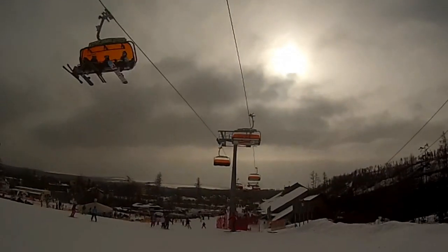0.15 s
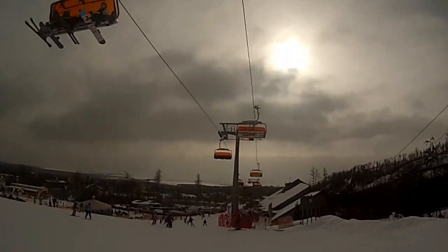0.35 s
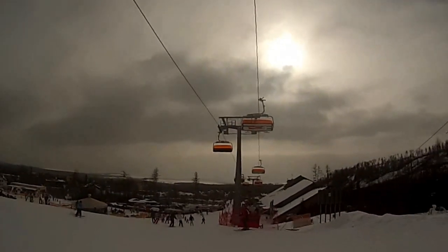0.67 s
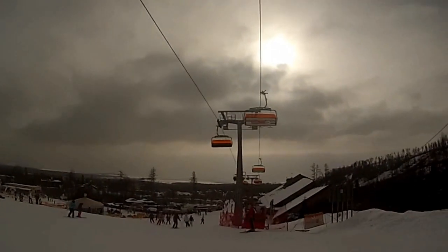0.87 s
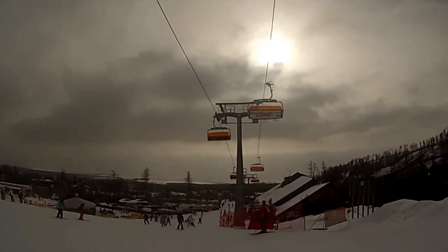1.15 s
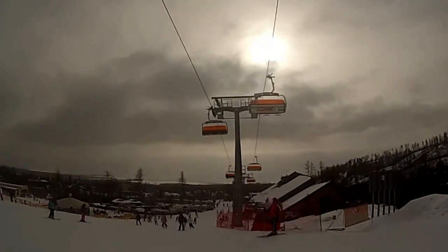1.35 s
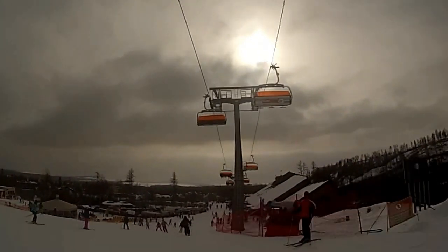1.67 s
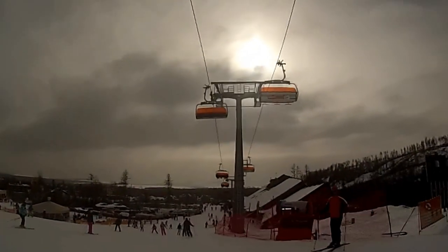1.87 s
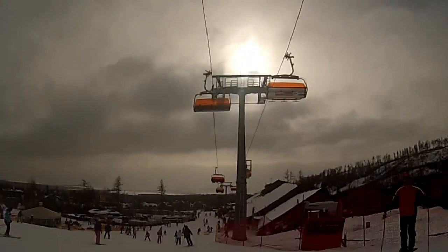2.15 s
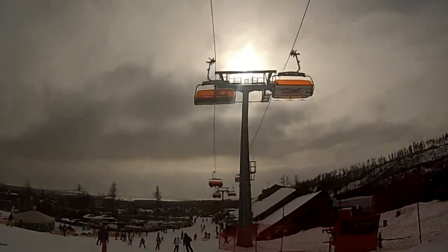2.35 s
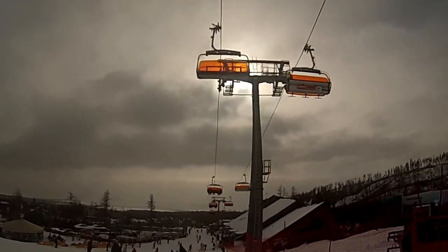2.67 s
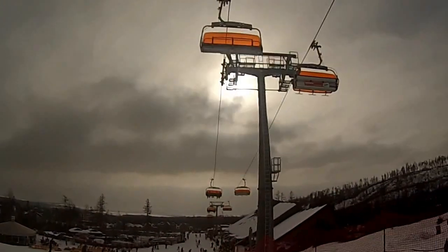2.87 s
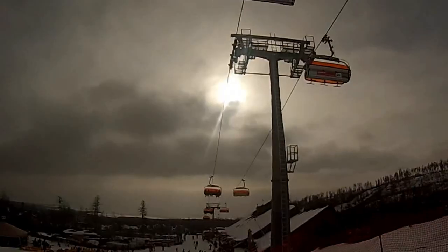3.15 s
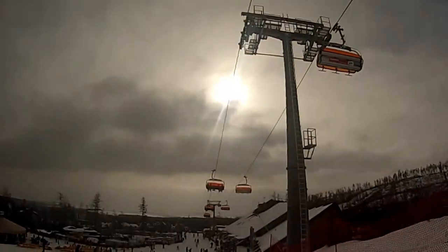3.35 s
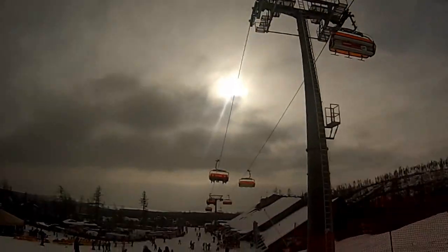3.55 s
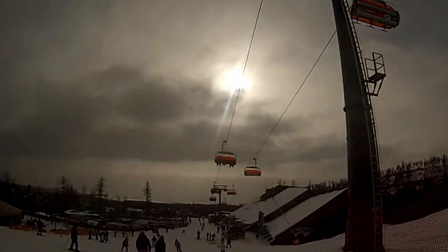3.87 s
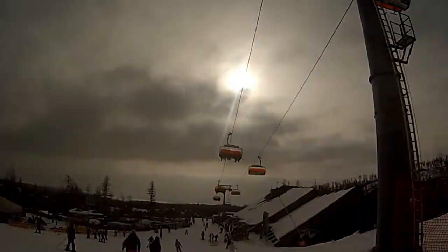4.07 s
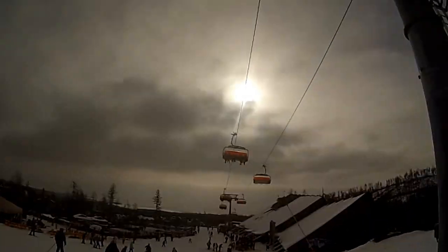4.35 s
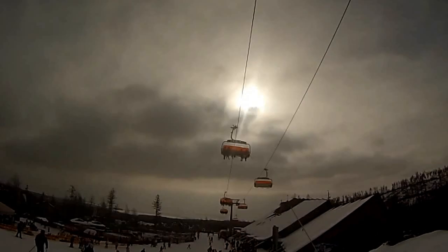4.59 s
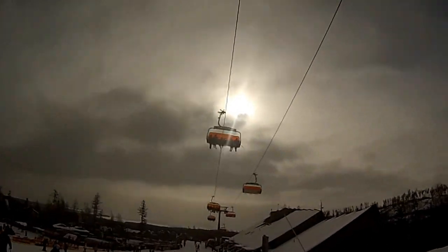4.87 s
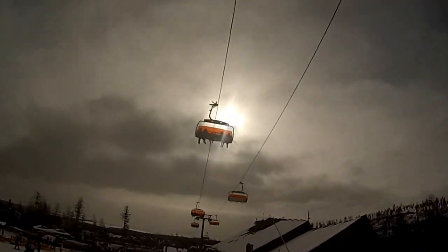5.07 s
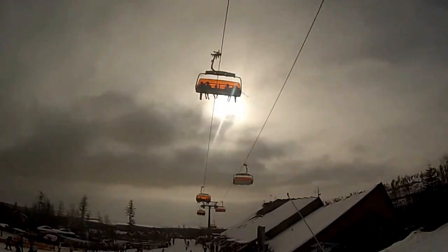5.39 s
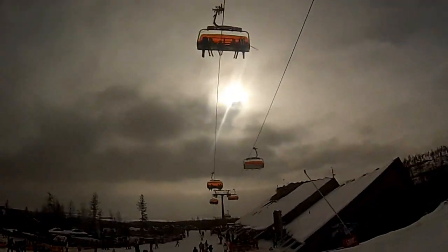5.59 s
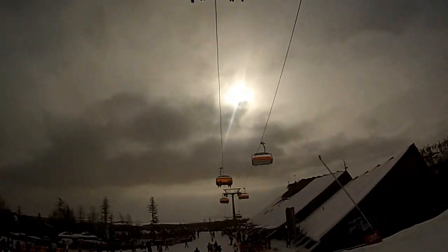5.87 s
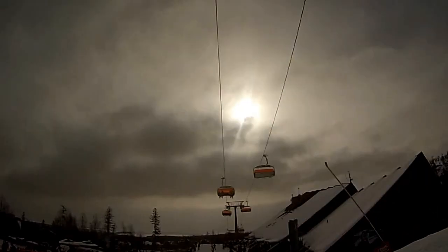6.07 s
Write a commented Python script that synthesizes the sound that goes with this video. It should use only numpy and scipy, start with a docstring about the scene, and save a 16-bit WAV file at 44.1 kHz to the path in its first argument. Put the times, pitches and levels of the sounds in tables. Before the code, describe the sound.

Low lumpy wind buffets a microphone over a gritty ski hiss on snow, swelling midway, with three hard thumps near five seconds.

```python
"""A snow slope, heard from a camera in a closed housing that rides downhill on a skier.
Wind buffets the microphone port: lumpy low-band noise at the eddy pace, with a broad roar above it.
Skis hiss and ice grains tick: tilted, flickering noise and short puffs through the housing's resonances.
Three hard gusts thump the membrane: pointed pressure pushes with a crack; a limiter ducks everything briefly."""
import sys
import numpy as np
from scipy import signal
from scipy.fft import rfft, irfft
from scipy.io import wavfile
from scipy.ndimage import uniform_filter1d

SR = 44100
rng = np.random.default_rng(int(sys.argv[2]) if len(sys.argv) > 2 else 0)


def inscribe(sig):
    """Save sig as 16-bit PCM at rate SR to the path in sys.argv[1].

    A 1-D sig is mono; a 2-D sig holds one channel per row.
    Samples are clipped to [-1, 1] before scaling.
    """
    pcm = np.round(np.clip(np.atleast_2d(sig).T, -1, 1) * 32767)
    wavfile.write(sys.argv[1], SR, pcm.astype(np.int16))


def invert_db(level):
    """Linear amplitude ratio for a level in decibels (20 dB per decade), elementwise."""
    return 10 ** (np.asarray(level, dtype=float) / 20)


N = 274743


def evened(x):
    """Scales to rms 1."""
    return x / np.sqrt(np.mean(x ** 2) + 1e-20)


def curve(rows, column, t):
    """Reads one column of a table at times t, linear between rows."""
    return np.interp(t, [row[0] for row in rows], [row[column] for row in rows])


def one_pole(x, r):
    """First-order low-pass with pole r and unit gain at 0 Hz."""
    return signal.lfilter([1 - r], [1, -r], x)


def noise(field_db, size):
    """Noise whose short-time level follows field_db(t, hz); a field of 0 dB gives rms 1."""
    hop = size // 4
    t = np.arange(N // hop + 5) * hop / SR
    hz = np.fft.rfftfreq(size, 1 / SR)
    real, imag = rng.standard_normal((2, len(t), len(hz)))
    gain = invert_db(field_db(t[:, None], hz[None] + 1))  # + 1 keeps log(hz) finite
    spectra = (real + 1j * imag) * gain / np.sqrt(size / 3)
    return signal.istft(spectra.T, nperseg=size, noverlap=size - hop)[1][:N]


def chance(t, hz, seconds, width_hz):
    """A smooth random field of rms 1 over time and frequency."""
    frames = max(1, round(seconds / (t[1, 0] - t[0, 0])))
    bins = max(1, round(width_hz / (hz[0, 1] - hz[0, 0])))
    field = uniform_filter1d(rng.standard_normal((t.size, hz.size)), frames, 0)
    return evened(uniform_filter1d(field, bins, 1))


def wind_db(t):
    """Level of the wind: uneven airflow with single buffets added on top, summed as power."""
    # uneven airflow over the port, rising and dropping: start_s, level_db
    airflow = [(0.0, -33.5), (0.8, -31.5), (1.17, -33), (1.55, -30), (1.75, -37), (1.83, -29.5),
               (2.39, -37.5), (2.64, -30.5), (3.17, -37), (3.31, -23.5), (3.54, -22), (3.71, -33),
               (3.88, -19), (4.12, -31.5), (4.46, -29), (4.7, -19), (4.95, -33.5), (5.2, -21.5),
               (5.32, -33.5), (5.6, -32), (6.23, -30)]
    # buffets riding on the airflow: peak_s, peak_db
    buffets = [(0.18, -27), (0.41, -28.5), (0.55, -32), (1.01, -30), (1.23, -30), (1.92, -27), (2.11, -27),
               (2.29, -27.5), (2.49, -27), (2.98, -27.5), (3.13, -33.5), (4.03, -14), (4.25, -22.5),
               (4.42, -26.5), (4.7, -25), (5.02, -20), (5.39, -24), (5.63, -30), (5.739, -16), (5.98, -23)]
    rise_db_s, fall_db_s = 160, 172
    power = invert_db(2 * curve(airflow, 1, t))
    for s, db in buffets:
        drop_db = np.where(t < s, rise_db_s * (s - t), fall_db_s * (t - s))
        power = power + invert_db(2 * (db - drop_db))
    return 10 * np.log10(power)


def buffeting(width_hz=60, steady=0.36, top_hz=76):
    """Eddies shed at the port: noise in a low wide resonance, its own lumps partly evened."""
    # pace at which eddies are shed: start_s, pace_hz
    shedding = [(0, 41.95), (1, 39.03), (2.6, 49), (4, 41.96), (5.2, 32.88), (6.23, 40)]
    t, r = np.arange(N) / SR, np.exp(-np.pi * width_hz / SR)
    slow = rng.standard_normal(N) + 1j * rng.standard_normal(N)
    slow = one_pole(one_pole(slow, r), r)
    carrier = np.exp(2j * np.pi * np.cumsum(curve(shedding, 1, t)) / SR)
    band = signal.butter(2, [13, top_hz], "band", fs=SR, output="sos")
    eddies = evened(signal.sosfiltfilt(band, (slow * carrier).real))
    lumps = np.sqrt(abs(uniform_filter1d(uniform_filter1d(eddies ** 2, 1500), 1000)))
    return evened(eddies / (lumps + 0.1) ** steady) * invert_db(wind_db(t))


def snow(t):
    """Level and brightness of the ski hiss: glide plus bites, each colouring by its share of the power."""
    # skis gliding: start_s, level_db, brightness_db_per_octave
    glides = [(0.0, -47.5, 1.5), (0.95, -50, 1), (1.25, -46.5, 1.5), (1.45, -49, 2), (1.75, -45.5, 1),
              (2.2, -47, 1.2), (2.55, -43, 0), (2.76, -45, 0), (3.09, -46.5, 0.7), (3.43, -36.5, -2),
              (3.72, -46, 1.5), (3.8, -39.5, 2), (3.94, -31, -0.5), (4.07, -31, 1.3), (4.23, -36.5, -2),
              (4.54, -46.5, -1), (4.78, -46.5, 1.5), (4.95, -44.5, -1), (5.1, -44, 0.5), (5.2, -43.5, -2.5),
              (5.5, -43.5, -1), (5.68, -43.5, 1), (6.23, -43.5, -0.8)]
    # edges bite harder snow: peak_s, peak_db, rise_s (for the last 10 dB), brightness_change_db_per_octave
    bites = [(0.09, -43.5, .06, -4.5), (0.46, -46.5, 0.036, -1.5), (0.62, -55, .05, 0),
             (0.77, -50.5, .05, 0), (2.03, -44.5, 0.15, -2), (2.67, -48.5, 0.1, 0.5),
             (2.9, -42.5, 0.098, .5), (3.742, -35, .006, 0), (4.825, -54, 0.015, 4.5),
             (4.935, -53, 0.023, -6), (5.7, -38.5, .008, 2), (5.76, -37.5, 0.066, 0),
             (5.86, -43.5, 0.079, -1)]
    fall_s = 0.074  # to drop 10 dB
    power = invert_db(2 * curve(glides, 1, t))
    colour = 0
    for s, db, rise_s, change in bites:
        bite = invert_db(2 * db - 20 * np.where(t < s, (s - t) / rise_s, (t - s) / fall_s))
        power = power + bite
        colour = colour + bite * change
    return 10 * np.log10(power), curve(glides, 2, t) + colour / power


def roar(level_db=-47.5, with_wind=0.21, with_gusts=0.56, with_skis=0.68, patchy_db=1.25):
    """Air roaring over the housing: broad low noise that swells with the wind, its slow gusts and the skis."""
    # spectrum before scaling to level_db: pitch_hz, relative_db (per Hz)
    spectrum = [(50, -53), (85, 6), (176, -2.5), (258, -5.5), (404, -8), (611, -12), (1150, -13.5),
                (1500, -56), (2530, -120)]
    spectrum_hz, spectrum_db = np.transpose(spectrum)

    def field(t, hz):
        wind, hiss = wind_db(t), snow(t)[0]
        gusts = uniform_filter1d(wind, size=120, axis=0)  # 0.7 s mean
        # wind drives the bottom, snow the top
        low, middle = 1 / (1 + (hz / 130) ** 2), 1 / (1 + (hz / 500) ** 2)
        swell = with_wind * low * (wind - gusts)
        swell = swell + with_gusts * middle * (gusts - gusts.mean())
        swell = swell + with_skis * (1 - middle) * (hiss - hiss.mean())
        colour = np.interp(np.log(hz), np.log(spectrum_hz), spectrum_db)
        return colour + swell + patchy_db * chance(t, hz, 0.07, 450)
    return invert_db(level_db) * evened(noise(field, size=1024))


def housing(x):
    """Causal minimum-phase filter with the summed power of the resonances; white noise keeps its rms."""
    # resonances of the housing and its port: pitch_hz, width_hz (6 dB down), relative_db
    resonances = [(1327, 204, -4.5), (1477, 305, 1.5), (1682, 230, 6.5), (2153, 920, -1.5), (2466, 520, -6),
                  (3310, 730, -12.5), (3870, 800, -21), (4729, 1310, -11), (6570, 780, -18.5),
                  (7690, 2150, -28.5), (9100, 1150, -31.5), (10790, 1650, -33.5), (12100, 7100, -39.5),
                  (14050, 950, -42)]
    leak_db = -91
    hz = np.abs(np.fft.fftfreq(4096, 1 / SR))
    power = invert_db(2 * leak_db)
    for f, width, db in resonances:
        power = power + invert_db(2 * db) / (1 + (2 * (hz - f) / width) ** 2) ** 2
    log_gain = np.log(power) / 2
    phase = -signal.hilbert(log_gain).imag
    taps = np.fft.ifft(np.exp(log_gain + 1j * phase)).real[:2048]
    return signal.oaconvolve(x, taps / np.linalg.norm(taps))[:N]


def skis(flicker_db=0.5, patchy_db=0.77, wander_db=1.26, top_lag=0.36, mid_lag=0.24):
    """Snow crushed under the skis: flickering hiss and a scatter of grit, before the housing."""
    grit_db, grit_per_s, spread_db = -11, 260, 4.6  # grit_db is relative to the hiss level

    def field(t, hz):
        level, tilt = snow(t)
        swell = level - level.mean()
        # uneven snow shakes all bands at once
        chatter = flicker_db * chance(t, hz, 0.02, 25000)
        # the highest treble and the band above the main resonance follow the swells less
        lag = top_lag * swell / (1 + (9000 / hz) ** 4)
        lag = lag + mid_lag * swell * np.exp(-((hz - 2400) / 450) ** 2)
        # random colour wanders through the low hiss in narrow patches
        wander = wander_db * chance(t, hz, 0.03, 350) * (hz < 3000)
        patches = patchy_db * chance(t, hz, 0.073, 1400)
        return tilt * np.log2(np.clip(hz, 700, 7000) / 1750) + chatter + patches + wander - lag

    grains = invert_db(spread_db * np.minimum(rng.exponential(1, N), 4.5))
    grains = grains * (rng.random(N) < grit_per_s / SR)
    decay = np.exp(-np.arange(400) / 70)
    grit = evened(signal.oaconvolve(grains, decay)[:N] * rng.standard_normal(N))
    level_db = snow(np.arange(N) / SR)[0]
    return (noise(field, size=256) + invert_db(grit_db) * grit) * invert_db(level_db)


def ticks(rise_s=0.0024):
    """Scrapes of ice and spray: puffs of noise that start sharply, hold and break off; before the housing."""
    # scrapes: start_s, level_db (nominal peak before tilt), brightness_db_per_octave, length_s
    scrapes = [(0.066, -26, -5, 0.0085), (0.43, -21.5, -2.3, 0.0062), (0.443, -29.5, -8, 0.0093),
               (0.473, -26.5, 1.5, 0.0049), (0.6045, -29, -6, 0.029), (0.686, -33, 3, 0.0061),
               (0.7444, -34.5, -1, 0.011), (0.905, -32.5, -1, 0.01), (2.067, -25, -7, 0.0076),
               (2.4936, -25, -8, 0.0067), (2.733, -25.5, -12, 0.008), (3.259, -29, -10, 0.0065),
               (3.547, -22.5, -7, 0.0085), (3.659, -26, -1.5, 0.013), (3.7406, -25, -8, 0.01),
               (3.83, -28, -3, 0.01), (5.239, -33, -14, 0.01), (5.573, -29.5, 0.5, 0.016),
               (5.6175, -26, -2, 0.017), (5.926, -24, -2, 0.0074)]
    size = 4096
    out, t = np.zeros(N + size), np.arange(size) / SR
    octaves = np.log2(np.clip(np.fft.rfftfreq(size, 1 / SR), 1400, 8000) / 1750)
    for s, db, tilt, length_s in scrapes:
        puff = irfft(rfft(rng.standard_normal(size)) * invert_db(tilt * octaves))
        shape = np.exp(-(t / length_s) ** 3) * np.minimum(t / rise_s, 1)
        at = round(s * SR)
        out[at:at + size] += puff * shape * invert_db(db) / 3  # peaks are about three times the rms
    return out[:N]


def thumps(vent_hz=44, swing_share=2.2, body_db=3):
    """A pointed pressure push that swings back through the port's vent, with a crack at its tip."""
    # gust thumps, levels before filtering: peak_s, push_db, crack_db
    gusts = [(4.7365, -1, -37), (4.8445, 1.5, -34), (4.8915, -3.5, -40)]
    rise_s, fall_s, crack_s = 0.004, 0.006, 0.0025
    t = np.arange(N) / SR
    push, crack_shape = np.zeros(N), np.zeros(N)
    for s, push_db, crack_db in gusts:
        push += invert_db(push_db) * np.exp(np.where(t < s, (t - s) / rise_s, (s - t) / fall_s))
        crack_shape += invert_db(crack_db) * np.exp(-((t - s - crack_s / 2) / crack_s) ** 2)
    push = signal.sosfiltfilt(signal.butter(1, 220, fs=SR, output="sos"), push)
    swing = signal.lfilter(*signal.iirpeak(vent_hz, 2.5, SR), push)
    direct = signal.sosfilt(signal.butter(1, 20, "high", fs=SR, output="sos"), push)
    crack = rng.standard_normal(N) * crack_shape
    dull = signal.lfilter([0.3], [1, -0.85], crack)
    return swing_share * swing + direct + dull + invert_db(body_db) * housing(crack)


def scene():
    """Wind acts on the membrane directly; snow sounds come through the housing."""
    return (buffeting() + roar() + housing(skis() + ticks()) + thumps())[None]


def top_cut(x):
    """Nothing passes above the cut-off."""
    return signal.sosfilt(signal.butter(12, 15440, fs=SR, output="sos"), x)


def record(dry):
    """Treble roll-off, then a peak limiter that bites within a few ms and lets go at a steady dB rate."""
    top_hz, threshold_db, recover_db_s, lag_s = 14500, -11, 120, 0.006
    dry = signal.sosfilt(signal.butter(6, top_hz, fs=SR, output="sos"), dry)
    fall_db = np.arange(N) * recover_db_s / SR
    peak_db = 20 * np.log10(abs(dry[0]) + 1e-9)
    held_db = np.maximum.accumulate(peak_db + fall_db) - fall_db
    over_db = np.maximum(held_db - threshold_db, 0)
    cut_db = one_pole(over_db, np.exp(-1 / (lag_s * SR)))
    return top_cut(dry / invert_db(cut_db))


dry = scene()
out = record(dry)
inscribe(out)
```